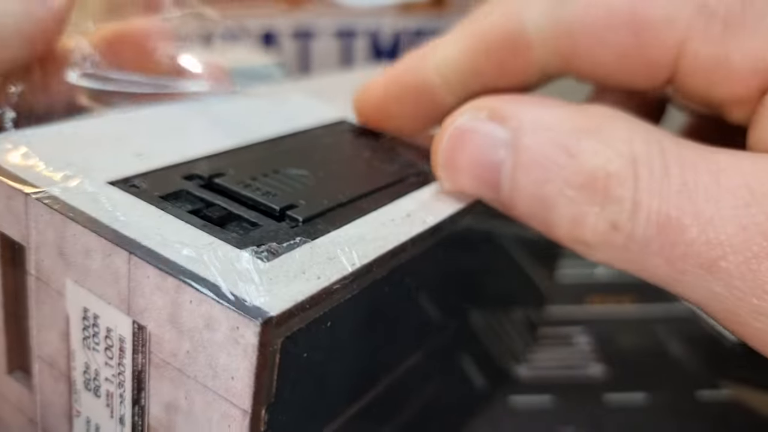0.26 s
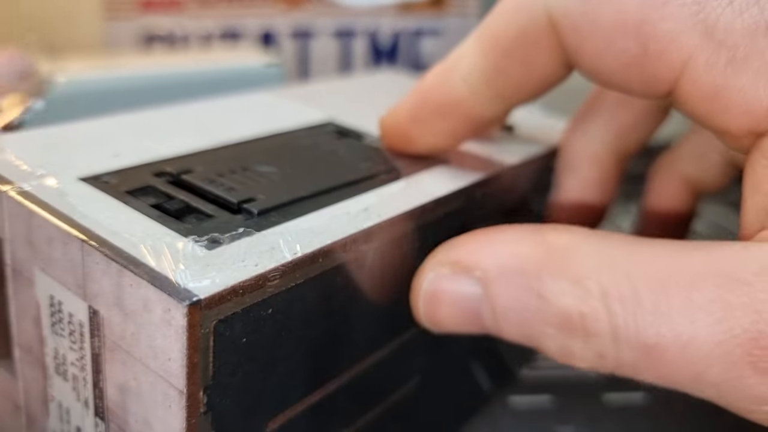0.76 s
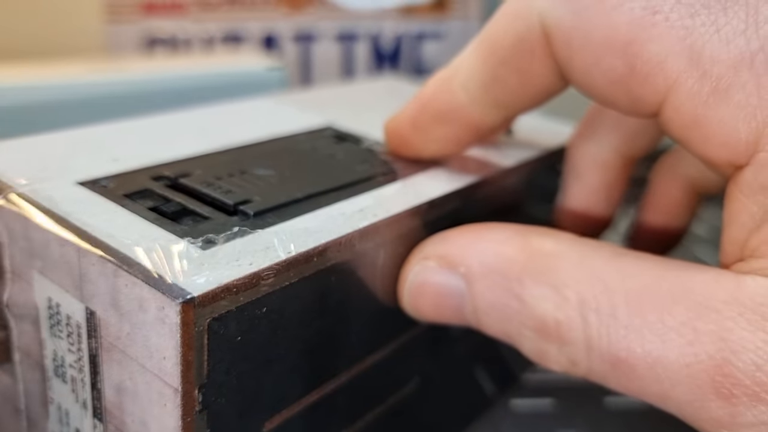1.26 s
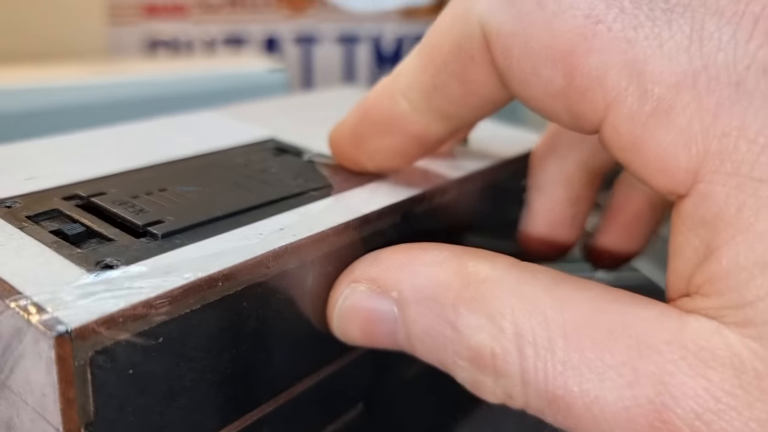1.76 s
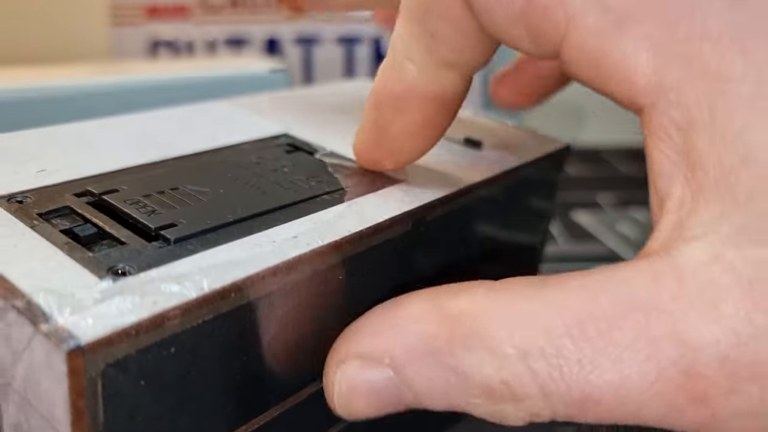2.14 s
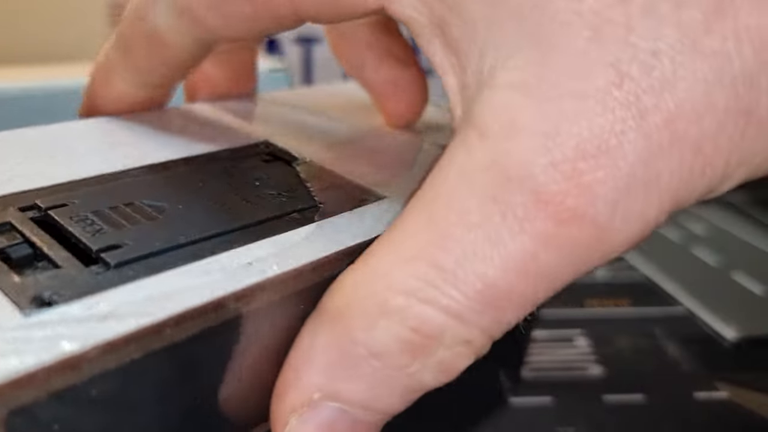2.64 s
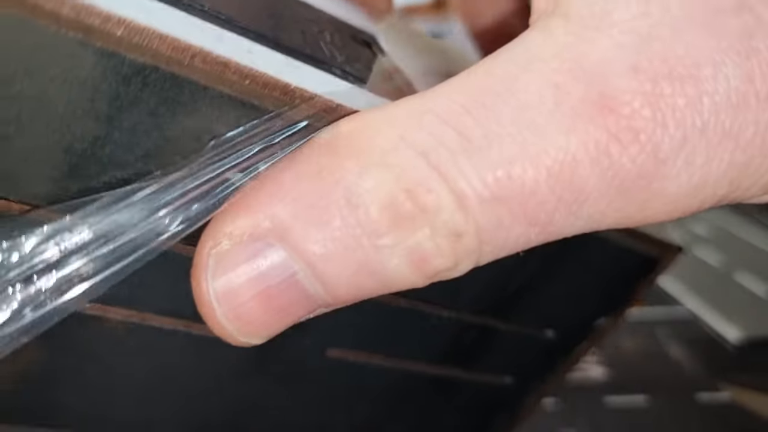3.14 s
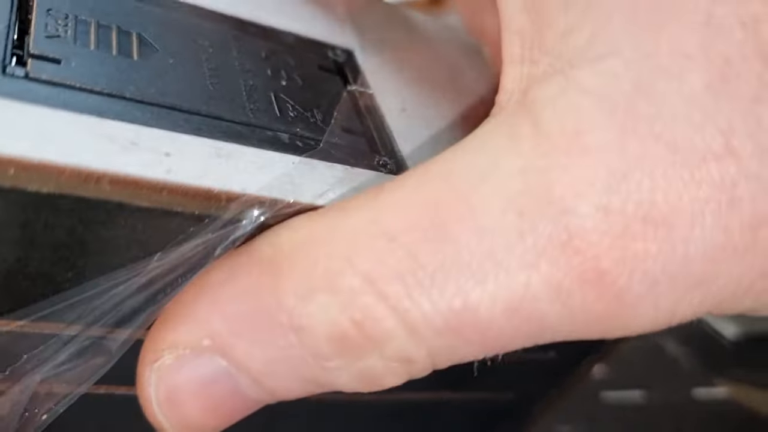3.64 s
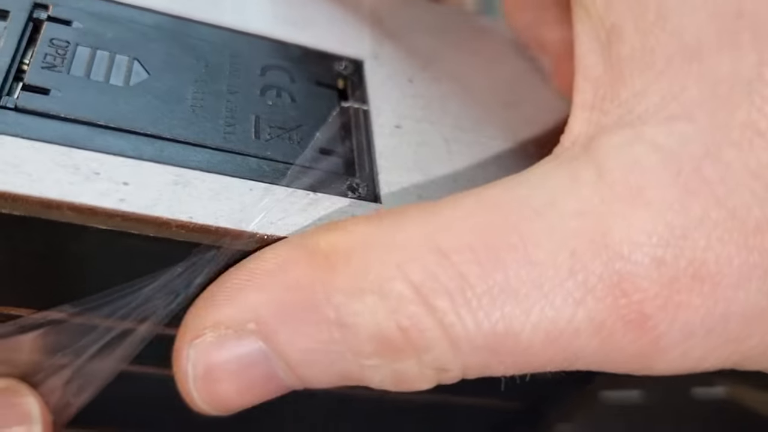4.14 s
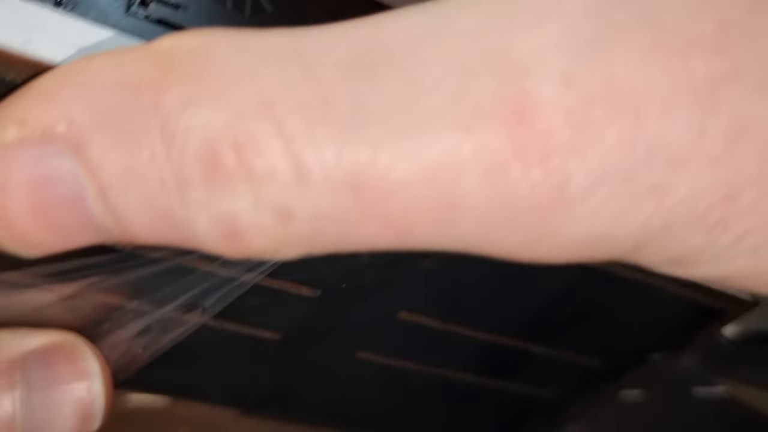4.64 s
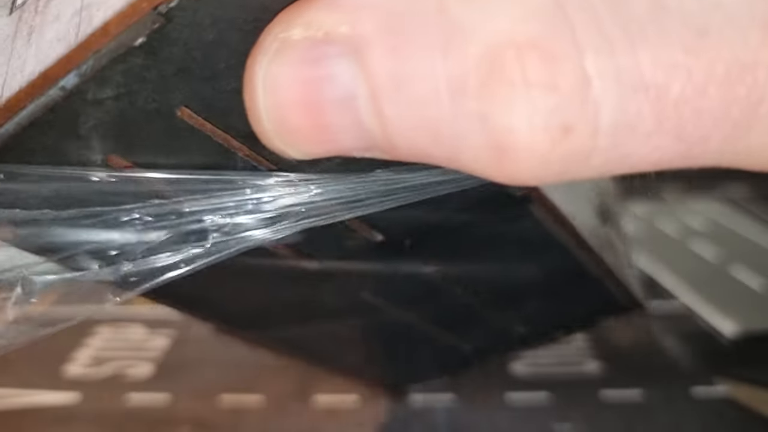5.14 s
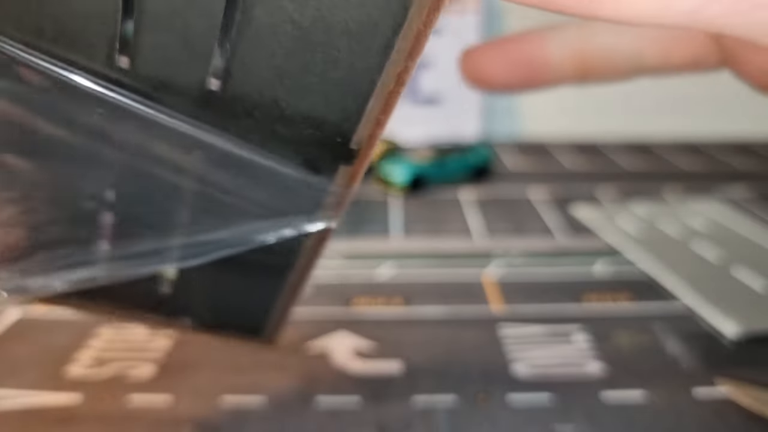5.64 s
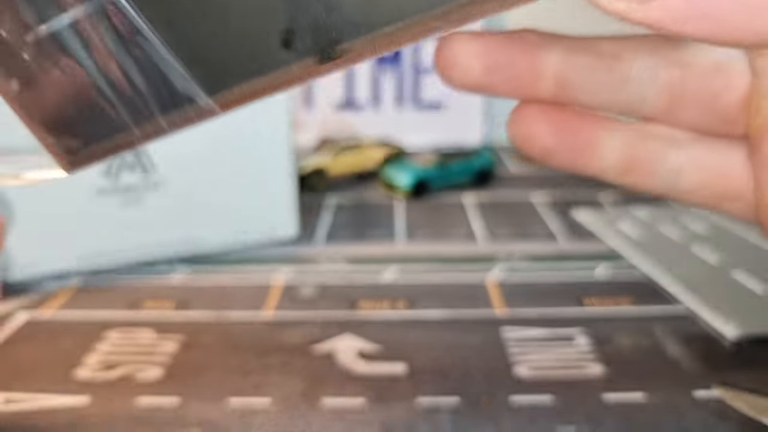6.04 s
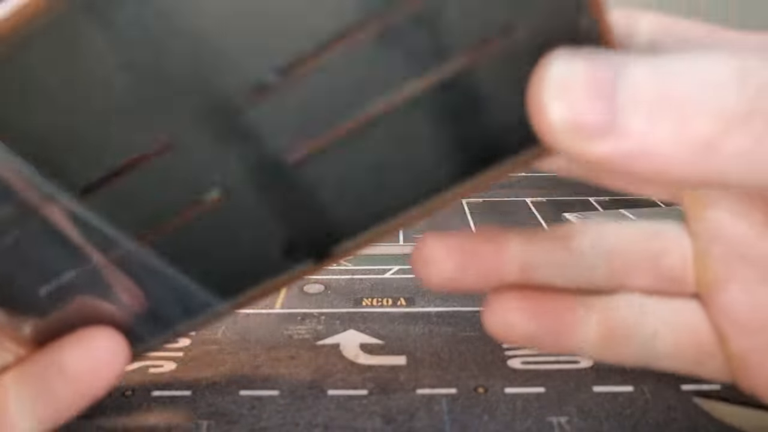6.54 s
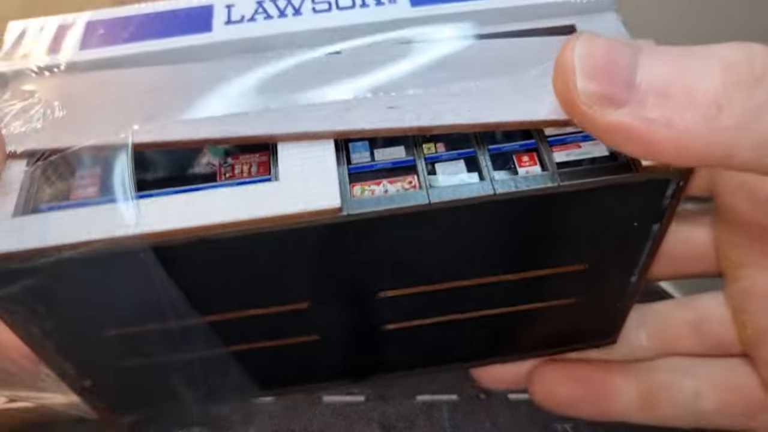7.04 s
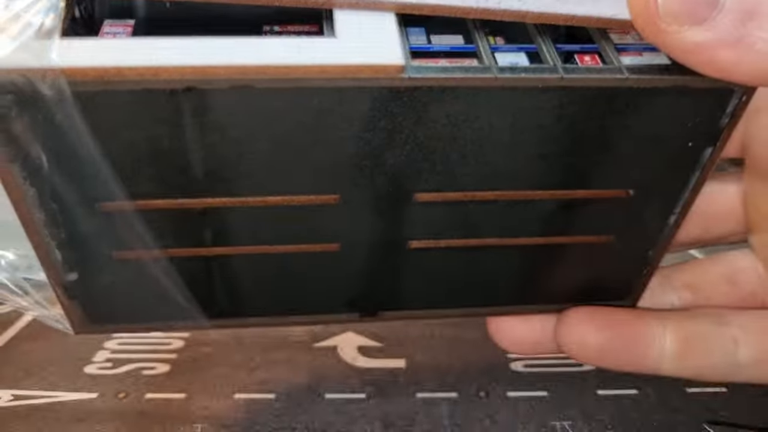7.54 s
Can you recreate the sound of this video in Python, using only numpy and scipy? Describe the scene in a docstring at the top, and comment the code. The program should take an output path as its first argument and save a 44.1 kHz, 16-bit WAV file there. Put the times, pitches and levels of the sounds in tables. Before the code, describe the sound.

A close, dry stereo perspective in a quiet room with faint steady hiss. From 0 to 0.5 s there are a few small snaps and a brief tug of thin plastic film. From about 0.6 to 1.7 s the film peels in stuttering jerks, rasping and drumming on a small hollow wooden box, ending with a firm knock and snaps near 1.6 s. Crisp crackles and short tugs continue, then the loudest cracks burst out around 2.8 s with woody knocks. Scattered snaps thin out by 3.5 s. Between 3.6 and 4.6 s it is calmer: light rustle and a soft, dry thumb rub. Snaps return at 4.7 s, a sharp, higher knock lands at 5.3 s, and bright crinkling swells repeatedly around 5.8 to 6.4 s. After a slight lull, more tugs and a hollow knock near 7.2 s follow, with soft low grip thuds, and crackling continues to the end, just before 8 s.

```python
"""Thin plastic film is peeled off a small hollow wooden model, close by in a quiet room, for almost 8 s.
First come a few snaps and tugs, then until about 1.7 s the film slips in jerks that drum on the hollow box.
Loud snaps follow near 2.8 s; from 3.6 to 4.6 s it is calmer, and a thumb rubs the film with filtered noise.
Then tugs, snaps and knocks return to the end. Snaps and crinkle are short noise cracks, knocks are struck
resonances and the hands' soft thuds are wobbling low tones. A faint room hiss runs throughout."""
import sys
import numpy as np
from scipy import signal
from scipy.fft import rfft, irfft
from scipy.io import wavfile
from scipy.ndimage import uniform_filter1d

SR = 44100
rng = np.random.default_rng(int(sys.argv[2]) if len(sys.argv) > 2 else 0)


def dump(signal):
    """Clip the signal to [-1, 1] and save it as 16-bit WAV at the path in sys.argv[1]."""
    limited = np.clip(np.atleast_2d(signal).T, -1, 1)
    pcm = np.round(limited * 32767).astype(np.int16)
    wavfile.write(sys.argv[1], SR, pcm)


N = 343539
TIME = np.arange(N) / SR   # seconds

# the quiet background's colour: [f/Hz, spectrum/dB]
ROOM_COLOUR = [(30, -4.5), (120, -5.5), (600, -15.5), (15000, -33)]
# soft thuds as the grip changes: [t/s, level/dB before a shared lift, average pitch f/Hz]
GRIP_THUDS = [(0.419, -42.5, 95.4), (1.139, -60, 101.7), (1.629, -32.5, 181.3), (2.108, -42.5, 92),
              (2.502, -38.5, 91.6), (2.581, -42.5, 86.6), (2.84, -45, 68.4), (3.669, -49.5, 49.7),
              (5.335, -47, 96.8), (5.429, -43.5, 125.8), (6.089, -38.5, 105.3), (6.239, -42.5, 102.3),
              (6.348, -41.5, 111), (7.161, -41.5, 99.2), (7.291, -44.5, 90)]
# a thumb rubbing over the film: [t/s, level/dB]
THUMB_RUB = [(3.551, -80), (3.699, -52.5), (3.86, -62), (4.08, -53), (4.27, -70), (4.45, -51), (4.6, -80)]
# light rustle of the held film between tugs: [t/s, base level/dB, shifted for sheet and edge]
HELD_FILM = [(0, -56), (.2, -76.5), (.36, -61.5), (.6, -81), (.72, -52), (1.5, -42), (1.8, -51.5),
             (2.0, -46), (2.55, -54), (3.45, -55), (3.85, -60), (4.62, -58), (4.8, -56.5), (5.14, -56.5),
             (5.35, -46.5), (6.25, -49.5), (6.76, -60.5), (7.25, -48), (7.72, -56.5)]
# tugs that crumple the sheet and pull some of it off the wood:
# [t/s, length/s, crinkle level/dB before a shared trim, box level/dB], each level before it sags
FILM_TUGS = [(0.418, 0.015, -36.5, -43.5), (0.471, 0.029, -44.5, -50.5), (0.645, 0.029, -34.5, -32.5),
             (0.673, 0.088, -44, -34.5), (0.822, 0.053, -41, -41.5), (0.927, 0.042, -35.5, -29),
             (0.998, .08, -38, -37), (1.123, 0.061, -36, -29.5), (1.216, 0.12, -40.5, -55),
             (1.314, .105, -33.5, -37.5), (1.475, 0.16, -36.5, -31.5), (1.895, 0.027, -33.5, -65),
             (1.949, 0.024, -40, -52), (2.115, 0.035, -37, -46), (2.231, 0.14, -38.5, -51.5),
             (2.691, .025, -44, -48), (2.833, 0.042, -27.5, -28.5), (2.999, .05, -65.5, -42.5),
             (3.191, 0.029, -43.5, -59), (3.425, .1, -44.5, -50), (4.029, 0.03, -40.5, -68),
             (4.078, .1, -47.5, -64.5), (4.302, 0.025, -48.5, -52), (4.427, 0.058, -45, -79),
             (4.701, .09, -42.5, -75), (4.78, 0.046, -34, -42), (4.983, 0.054, -42, -52.5),
             (5.2, 0.083, -36.5, -71), (5.32, 0.069, -31, -41), (5.505, 0.046, -44, -44),
             (5.706, 0.126, -36, -46.5), (5.9, 0.1, -39.5, -45.5), (5.973, .1, -36.5, -48),
             (6.122, 0.13, -33, -47), (6.322, 0.14, -40, -51), (6.502, .085, -44, -50.5),
             (6.634, 0.021, -46, -51.5), (6.877, 0.052, -48.5, -45), (6.965, 0.21, -40, -43.5),
             (7.204, 0.098, -33, -40), (7.341, .11, -40.5, -45), (7.496, 0.2, -40.5, -73),
             (7.76, .03, -43.5, -77)]
# resonances of the hollow box: [f/Hz before the grip detunes it, width/Hz, strength/dB]
BOX_MODES = [(113, 102, -3), (201, 89, 0.5), (281, 60, 1), (417, 146, -4), (530, 94, -2.5), (652, 64, 1),
             (732.7, 87, -5), (1300, 66.5, -11.5)]
# light knocks on the box: [t/s, level/dB before a shared lift, pitch centre f/Hz]
BOX_KNOCKS = [(0.418, -33, 360), (0.627, -34.5, 675), (0.786, -32, 547), (0.999, -37, 368),
              (1.037, -32, 329), (1.272, -37, 755), (1.602, -23, 636), (1.836, -43, 201.4),
              (2.452, -32.5, 1133), (2.63, -40, 619), (2.834, -34, 987), (2.864, -25.5, 674),
              (2.892, -34, 394), (2.944, -34, 690), (3.226, -33, 1041), (3.511, -39, 652.6),
              (4.029, -46, 284.7), (4.791, -42, 556), (4.846, -41.5, 542.7), (5.327, -18, 1190),
              (5.387, -34, 434.7), (5.472, -37, 425), (5.744, -35, 472), (6.003, -35, 1124),
              (6.09, -36.5, 580), (6.331, -37, 565), (7.024, -35, 594), (7.159, -36.5, 522),
              (7.171, -24, 680), (7.18, -34, 700), (7.219, -36, 522), (7.289, -29, 550),
              (7.645, -38.5, 681.7), (7.724, -44.5, 530)]
# stick and slip of the peeling edge: [t/s, typical slips per s, unevenness/octaves]
EDGE_SLIPS = [(0.65, 334, 0.52), (1.15, 205, 0.65), (1.47, 105, 0.19), (1.58, 116, 0.19), (1.9, 286, 0.94)]
# depth of the box's voice as the edge moves over its panels: [t/s, bass tilt/dB per octave]
BOX_DEPTH = [(0.7, -1.5), (1.1, 1), (1.5, 2.5), (1.8, 5), (2.9, -4), (4.0, -2), (6.1, 0), (7.7, 1.5)]
# colour of the film: [f/Hz, spectrum/dB]
FILM_SPECTRUM = [(200, -15), (1200, -1.5), (2750, -2.5), (3150, -1), (5200, -1), (6900, 0), (7400, 1.5),
                 (8200, -2.5), (10800, -3.5), (12800, -0.5), (15500, 2.5), (16000, -1.5)]
# tautness of the film, taut film sounds brighter: [t/s, treble tilt/dB]
FILM_TAUTNESS = [(0.1, -14), (0.6, -12), (1.7, 4), (3.3, -68), (3.8, 12), (4.4, -11.5), (6.2, 7),
                 (6.8, -15), (7.7, 12)]
# creases whose snap stands out: [t/s, level/dB before a shared lift, treble tilt/dB]
BIG_SNAPS = [(0.0491, -34.5, -26), (0.2542, -41, 10), (0.283, -42.5, -3), (0.3903, -29, -30),
             (0.413, -33.5, 5), (0.6235, -25.5, -21.5), (0.7862, -27, -22), (1.4068, -24.5, 13),
             (1.603, -19, -3), (1.6308, -20.5, 18), (1.7766, -35, 13), (1.904, -25, 21), (1.9436, -23, 1),
             (1.977, -27.5, 22), (2.121, -27.5, 14), (2.214, -31, 18), (2.2266, -27, -1),
             (2.269, -28.5, -1), (2.293, -27, 7), (2.357, -28, 7), (2.452, -23, -27), (2.7014, -24.5, 8),
             (2.812, -14.5, 8), (2.8361, -8.5, -42), (2.8461, -11.5, -1), (2.965, -27.5, 22),
             (3.0046, -31, -5), (3.0895, -27, -1), (3.102, -34, 9), (3.128, -29.5, -17),
             (3.1483, -27.5, 11), (3.211, -29, 3), (3.2272, -22, -27), (3.2842, -29, 12), (3.333, -31, -4),
             (3.381, -33, 3), (3.4213, -33.5, 0), (3.4747, -28, 22), (3.5685, -37, 6), (3.7413, -34.5, 0),
             (3.7843, -38, -30), (3.816, -36, -6), (3.966, -36, 0), (4.1129, -38, 9), (4.158, -37.5, 14),
             (4.245, -42, 8), (4.3107, -27, -26), (4.407, -34.5, -19), (4.4388, -30, -17), (4.457, -31, 22),
             (4.547, -40, 0), (4.655, -34.5, -8), (4.6821, -22.5, -27), (4.7352, -25.5, -2),
             (4.7831, -19.5, 1), (4.881, -31, -1), (4.954, -30, 7), (5.0707, -34, 6), (5.161, -37, 8),
             (5.3285, -19, -19), (5.433, -26, 9), (5.5888, -32.5, 24), (5.6992, -31, 22),
             (5.7791, -20.5, 24), (5.974, -25.5, 25), (6.131, -37, 16), (6.1935, -23, 13), (6.303, -27, 15),
             (6.3258, -19, 14), (6.349, -21, 16), (6.578, -33, 2), (6.6468, -29.5, -7), (6.75, -38.5, -18),
             (6.8654, -37, 13), (7.0228, -22.5, -3), (7.1148, -24.5, -2), (7.4222, -24, 2),
             (7.6093, -26.5, -29)]

ROOM_GAIN_DB = -64.5
CUTOFF_HZ = 15900
FILM_LAG_S, BOX_LAG_S = .00038, 0.00029   # both are to the left, so the right side hears them later
# the box's deep resonances are shaded from the right side more than its high ones
BOX_PAN_DB, BOX_PAN_BELOW_HZ = 2, 380
# a tug takes hold quickly, eases as the film gives, and dies away when the hand stops
TUG_ATTACK_S, TUG_SAG_DB_PER_S, TUG_RELEASE_DB_PER_S = 0.01, 22.5, 398
RUSTLE_DB, CREEP_DB = 2, -7.5   # the sheet and the stuck edge, relative to the held film's base level
PULL_STEADY_S = 0.083   # the hand keeps its pull even over this span
LEAD_S = .003   # a faint swell of noise starts this long before each crack
STRAY_PER_S, STRAY_ABOVE_DB, STRAY_SPREAD_DB, STRAY_TILT_DB = 22, 10, 1, 11.5


def from_db(db):
    """Turn decibels into a loudness factor for the wave."""
    return 10 ** (np.asarray(db) / 20)


def rms_one(x):
    """Scale the whole sound to an average strength (rms) of 1."""
    return x / np.sqrt(np.mean(x ** 2) + 1e-20)


def unit_energy(x):
    """Scale each channel to a total energy of 1."""
    return x / np.sqrt(np.sum(x ** 2, axis=-1, keepdims=True))


def in_time(rows):
    """Read each column of a curve at every sample."""
    s, *columns = np.transpose(rows)
    return [np.interp(TIME, s, c) for c in columns]


def drift(per_s):
    """A random wander with a spread near 1, taking per_s new values each second."""
    steps = rng.standard_normal(1000)
    return np.interp(TIME * per_s, np.arange(len(steps)), steps)


def add(out, s, sound):
    """Mix a sound in, starting at time s."""
    i = max(round(s * SR), 0)
    out[..., i:i + sound.shape[-1]] += sound[..., :N - i]


def low_pass(x, hz):
    """Gently keep what lies below a frequency."""
    return signal.sosfilt(signal.butter(1, hz, fs=SR, output="sos"), x)


def coloured(x, points):
    """Shape the spectrum without sounding early (minimum phase); white noise keeps its power."""
    size = 4096
    hz, db = np.transpose(points)
    bins_hz = np.fft.rfftfreq(size, 1 / SR)
    gain = from_db(np.interp(np.log(bins_hz + 1), np.log(hz), db))
    # folding the cepstrum forward in time moves the filter's energy to its start
    cepstrum = irfft(np.log(gain))
    cepstrum[1:size // 2] *= 2
    cepstrum[size // 2 + 1:] = 0
    response = unit_energy(irfft(np.exp(rfft(cepstrum))))
    return signal.oaconvolve(x, response[None], axes=1)[:, :N]


def tilted(x, tilt_db, pivot_hz=5500):
    """Treble up and bass down around a pivot, at about equal power."""
    low = low_pass(x, pivot_hz)
    gain = from_db(tilt_db)
    return (low + gain * (x - low)) / np.sqrt((1 + gain ** 2) / 2)


def resonance(x, hz, width_hz):
    """Ring at one frequency: a two-pole band-pass with gain 1 on top."""
    r = np.exp(-np.pi * width_hz / SR)
    top = np.array([1, 0, -1]) * (1 - r * r) / 2
    bottom = [1, -2 * r * np.cos(2 * np.pi * hz / SR), r * r]
    return signal.lfilter(top, bottom, x + 1e-18)


def evened(x, span_s):
    """Bring every short span to about the same power; finer grain is kept."""
    power = uniform_filter1d(np.mean(np.atleast_2d(x) ** 2, axis=0), int(span_s * SR))
    smooth = uniform_filter1d(power, int(span_s * SR / 2))
    return x / np.sqrt(smooth + 1e-9 * power.mean())


def placed(left, right, lag_s, pan_db):
    """Stereo pair with the right side later and, for a positive pan, softer."""
    n = np.arange(len(right))
    late = np.interp(n - round(lag_s * SR), n, right, left=0)
    return np.array([left * from_db(pan_db / 2), late * from_db(-pan_db / 2)])


def room_tone():
    """Quiet background: coloured noise, partly shared by both sides."""
    air = rng.standard_normal(N) + .5 * rng.standard_normal((2, N))
    return from_db(ROOM_GAIN_DB) * coloured(air, ROOM_COLOUR)


def room(x, wet_db=-13, t60=0.26, onset_s=0.0034):
    """Echoes blur into a faint diffuse tail, different on each side."""
    t = TIME[:SR // 2]
    tail = unit_energy(rng.standard_normal((2, len(t))) * (t > onset_s) * from_db(-60 * t / t60))
    return x + from_db(wet_db) * signal.oaconvolve(x, tail, axes=1)[:, :N]


def thuds(cycles=1.47, level_db=2, wobble=0.21):
    """A fingertip lands and the held box rocks for a few cycles against the flesh."""
    out, t = np.zeros(N), TIME[:SR // 2]
    for s, db, hz in GRIP_THUDS:
        age = t * hz / cycles
        phase = 2 * np.pi * np.cumsum(hz * (1 + wobble * drift(hz)[:len(t)])) / SR
        swell = age * np.exp(1 - age)   # rises to 1, then dies away
        add(out, s, from_db(db + level_db) * swell * np.sin(phase))
    return placed(out, out, BOX_LAG_S, pan_db=1.0)


def rub(hz=1950, width_hz=1400, grip_db=6.0):
    """Skin drags unevenly over the film: a narrow, dry scrape."""
    s, db = np.transpose(THUMB_RUB)
    noise = rng.standard_normal((2, N))
    friction = resonance(resonance(noise, hz, width_hz), hz, width_hz)
    scrape = rms_one(friction * from_db(grip_db * drift(120)))
    return scrape * np.interp(TIME, s, from_db(db), left=0, right=0)


def effort():
    """Levels in dB of the crumpling sheet and of the peeling edge: tugs on top of the steady handling."""
    held_db, = in_time(HELD_FILM)
    power = from_db([held_db + RUSTLE_DB, held_db + CREEP_DB]) ** 2
    t = TIME[:SR // 2]
    for s, length_s, sheet_db, edge_db in FILM_TUGS:
        age = t - TUG_ATTACK_S
        sag_db = TUG_SAG_DB_PER_S * np.maximum(age, 0)
        release_db = TUG_RELEASE_DB_PER_S * np.maximum(age - length_s, 0)
        shape = np.minimum(t / TUG_ATTACK_S, 1) * from_db(-(sag_db + release_db))
        add(power, s - TUG_ATTACK_S, np.outer(from_db([sheet_db, edge_db]), shape) ** 2)
    return 10 * np.log10(power)


def box(force, strengths, detune=1):
    """The box rings in all its resonances, each as the point of contact allows; the grip detunes them."""
    ringing = 0
    for k, ((hz, width_hz, db), strength) in enumerate(zip(BOX_MODES, strengths)):
        sign = (-1) ** k   # neighbours push in opposite directions
        ringing = ringing + sign * from_db(db) * resonance(strength * force, hz * detune, width_hz)
    return ringing


def shaded(pair):
    """The right side gets less of the box's bass: lean the bass to the left."""
    gain = from_db([[BOX_PAN_DB / 2], [-BOX_PAN_DB / 2]])
    return pair + low_pass(pair, BOX_PAN_BELOW_HZ) * (gain - 1)


def jolts(strays, below_db=-9, hz=560):
    """A lesser crease jolts the box, a bright one on a stiffer panel; rows like those of BOX_KNOCKS."""
    return [(s, db + below_db, hz * np.sqrt(from_db(tilt_db / 2))) for s, db, tilt_db in strays]


def knocks(rows, level_db=26, reach_octaves=0.76, contact_s=0.0018, scuff=0.26,
           panel_width_hz=350, box_db=-5.5, grip_octaves=0.068):
    """A short contact pushes the panel under it and wakes the box resonances near its pitch."""
    out, t = np.zeros(N), TIME[:SR // 10]
    for s, db, centre_hz in rows:
        force = (t == 0) + scuff * rng.standard_normal(len(t)) * np.exp(-t / contact_s)
        strengths = [1 / (1 + (np.log2(hz / centre_hz) / reach_octaves) ** 2)
                     for hz, width_hz, mode_db in BOX_MODES]
        detune = 2 ** (grip_octaves * rng.normal())
        panel = resonance(resonance(force, centre_hz, panel_width_hz), centre_hz, centre_hz)
        hollow = unit_energy(box(force, strengths, detune))
        knock = unit_energy(unit_energy(panel) + from_db(box_db) * hollow)
        add(out, s, from_db(db + level_db) * knock)
    return placed(out, out, BOX_LAG_S, pan_db=-0.5)


def sheet_noise(pan_db):
    """Friction noise from the film, half of it common to both sides."""
    common = rng.standard_normal(N)
    left, right = common + rng.standard_normal((2, N))
    return rms_one(placed(left, right, FILM_LAG_S, pan_db))


def rasp(force, burst_s=0.0028, hz=2600, width_hz=1000, bright_db=-12, pan_db=2.5):
    """Each slip tears a strip of film loose with a short burst; close bursts fuse into a rasp."""
    fading = signal.lfilter([1], [1, -np.exp(-1 / (burst_s * SR))], force)
    bursts = sheet_noise(pan_db) * fading
    bright = from_db(bright_db) * coloured(bursts, FILM_SPECTRUM)
    return rms_one(resonance(bursts, hz, width_hz) + bright)


def peeling(pull_db, pan_db=0.5, size_spread_db=6.0, rasp_db=-11.0, wander_db=4.0,
            wander_per_s=30, clump_per_s=45):
    """Stuck film lets go in jerks that pluck the box; the moving edge favours changing resonances."""
    (per_s, uneven), (depth_db,) = in_time(EDGE_SLIPS), in_time(BOX_DEPTH)
    strengths = [from_db(depth_db * np.log2(400 / hz) + wander_db * drift(wander_per_s))
                 for hz, width_hz, db in BOX_MODES]
    force, i = np.zeros(N), 0
    size, wait = rng.standard_normal((2, N))
    size = size + drift(clump_per_s)   # strong jerks come in clumps
    while i < N:
        force[i] = from_db(size_spread_db * uneven[i] * size[i])
        i += 1 + int(SR / per_s[i] * 2 ** (uneven[i] * wait[i]))
    wood = evened(box(force, strengths), PULL_STEADY_S)
    tearing = evened(rasp(force), PULL_STEADY_S)
    return from_db(pull_db) * (placed(wood, wood, BOX_LAG_S, pan_db) + from_db(rasp_db) * tearing)


def buckle(pan_db, facet_db=9.0, stray_share=0.15, spread_s=.0001):
    """One crease flips with a crack within a millisecond, and the sheet shivers in its facet's colour."""
    t = TIME[:SR // 25] - LEAD_S
    crack_s, ring_db, ring_t60, lead_db, facet_width_hz = .00045, -2.5, .036, -12, 600
    noise, age = rng.standard_normal((4, len(t))), np.maximum(t, 0)
    crack, other = unit_energy(noise[:2] * np.exp(-age / crack_s) * (1 - np.exp(-age / crack_s)))
    lead_in = from_db(lead_db) * unit_energy((t < 0) * (t + LEAD_S))   # a faint swell before the crack
    ringing = from_db(ring_db) * unit_energy((t >= 0) * from_db(-60 * age / ring_t60))
    shiver = noise[2:] * (lead_in + ringing)
    stray = np.clip(stray_share, 0, 1)   # the sheet radiates differently to each side
    right = np.sqrt(1 - stray) * crack + np.sqrt(stray) * other
    lag_s = FILM_LAG_S + spread_s * rng.normal()
    pair = placed(crack, right, lag_s, pan_db) + shiver
    pair = pair + from_db(facet_db) * resonance(pair, rng.uniform(1500, 15000), facet_width_hz)
    return pair / np.sqrt(np.sum(pair ** 2) / 2)


def crinkle(crumple_db, rate_growth=0.6, level_db=-1, pan_db=2.0, slide_db=-11, count=90):
    """Many small creases flip at random, more with harder crumpling; folds hiss as they slide."""
    per_s, size_spread_db = 950, 9   # rate at the average crumpling level
    taut_db, = in_time(FILM_TAUTNESS)
    facets = np.array([buckle(pan_db) for k in range(count)])
    rate = per_s * from_db(rate_growth * (crumple_db - crumple_db.mean()))
    born = rng.random(N) < rate / SR
    sizes = from_db(size_spread_db * np.minimum(rng.standard_normal(N), 2.5)) * rng.choice([-1, 1], N)
    facet, out = rng.integers(0, count, N), np.zeros((2, N))
    for i in np.flatnonzero(born):
        add(out, TIME[i], sizes[i] * facets[facet[i]])
    sheet = evened(out, span_s=0.047) + from_db(slide_db) * sheet_noise(pan_db)
    toned = rms_one(tilted(coloured(sheet, FILM_SPECTRUM), taut_db))
    return from_db(crumple_db + level_db) * toned


def stray_snaps(crumple_db, count=300):
    """Lesser creases at random moments, crowding into the tugs, in rows like those of BIG_SNAPS."""
    wait, (size, tilt) = rng.exponential(1, count), rng.standard_normal((count, 2)).T
    # more creases are expected where the crumpling is harder
    expected = np.cumsum(STRAY_PER_S * rms_one(np.sqrt(from_db(crumple_db)))) / SR
    s = np.interp(np.cumsum(wait), expected, TIME)
    around_db = (np.interp(s, TIME, crumple_db) + np.interp(s, *np.transpose(HELD_FILM))) / 2
    db = around_db + STRAY_ABOVE_DB + STRAY_SPREAD_DB * size
    return [row for row in zip(s, db, STRAY_TILT_DB * tilt) if row[0] < TIME[-1]]


def snaps(rows, level_db=22, pan_db=4.5, pan_per_tilt=0.085, facet_db=-3.5, low_cut_hz=700):
    """Single large creases, bright ones further left; so light a sheet radiates little bass."""
    out = np.zeros((2, N))
    for s, db, tilt_db in rows:
        crease = tilted(buckle(pan_db + pan_per_tilt * tilt_db, facet_db), tilt_db)
        add(out, s - LEAD_S, from_db(db + level_db) * crease)
    low_cut = signal.butter(1, low_cut_hz, "high", fs=SR, output="sos")
    return signal.sosfilt(low_cut, coloured(out, FILM_SPECTRUM))


def scene():
    """Film and box sound in the room, with the hands' thuds and the quiet background added."""
    background = room_tone()
    crumple_db, pull_db = effort()
    strays = stray_snaps(crumple_db)
    wood = shaded(peeling(pull_db) + knocks(BOX_KNOCKS + jolts(strays)))
    film = crinkle(crumple_db) + rub() + snaps(BIG_SNAPS + strays)
    return room(film + wood) + thuds() + background


def record(dry):
    """Cut the top of the treble steeply."""
    return signal.sosfilt(signal.ellip(10, .3, 70, CUTOFF_HZ, fs=SR, output="sos"), dry)


dry = scene()
out = record(dry)
dump(out)
```